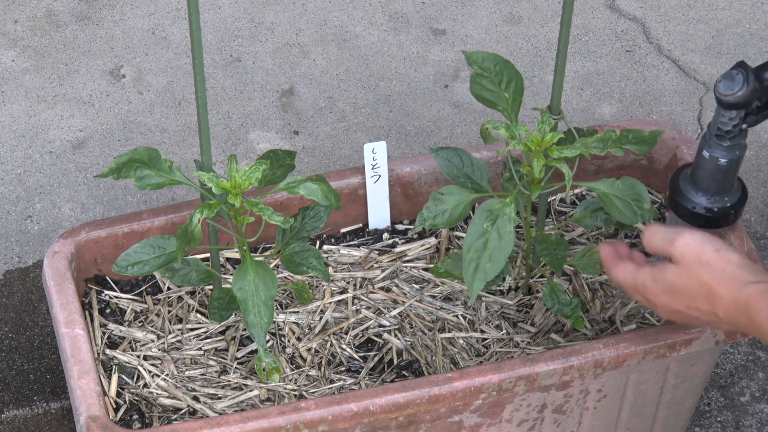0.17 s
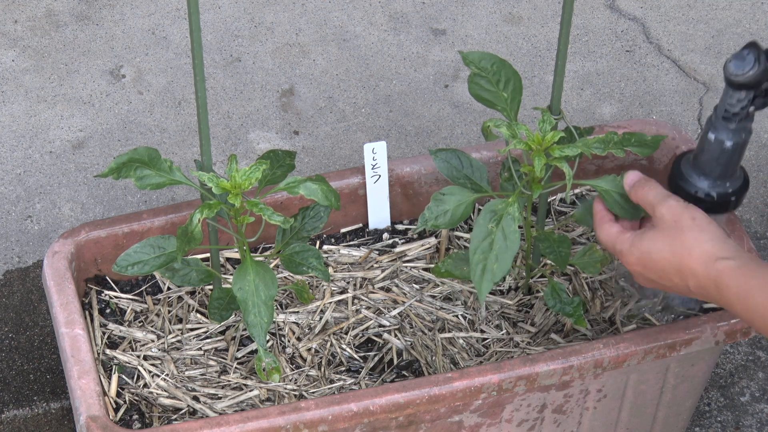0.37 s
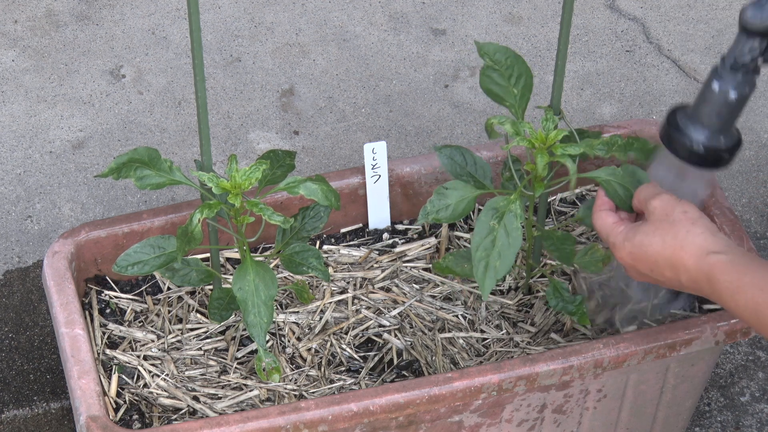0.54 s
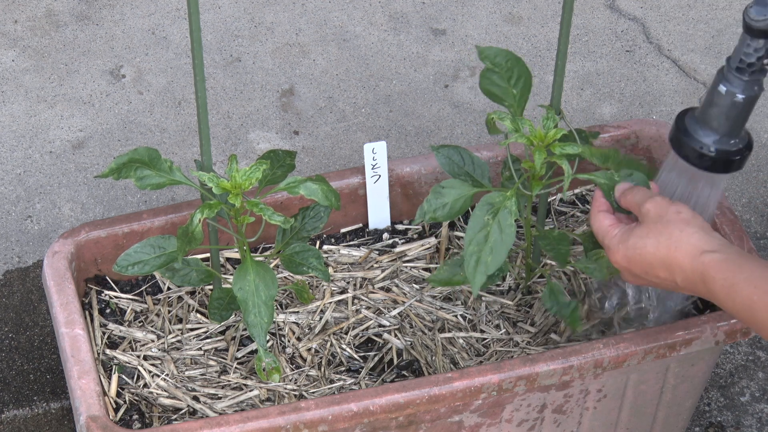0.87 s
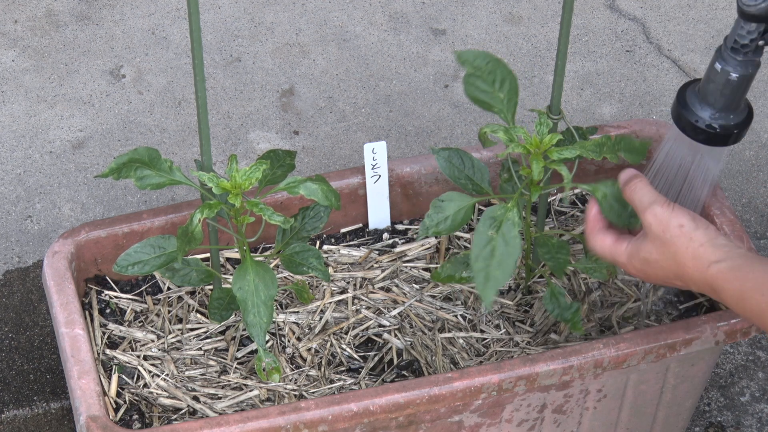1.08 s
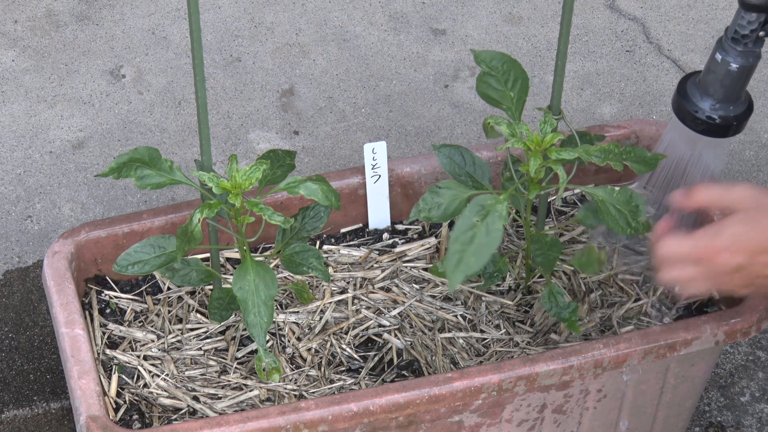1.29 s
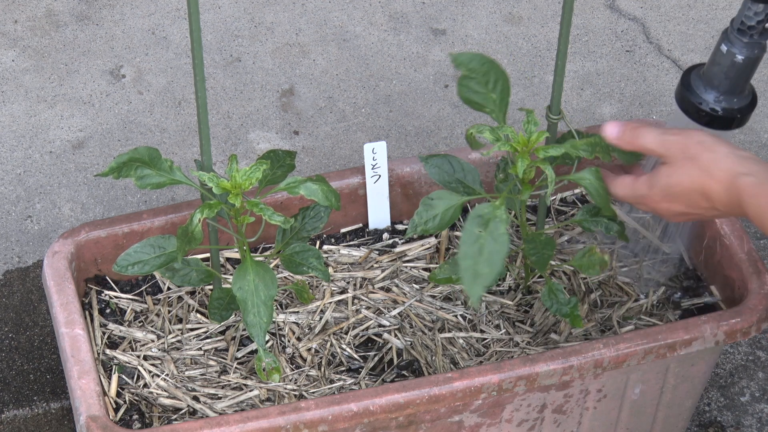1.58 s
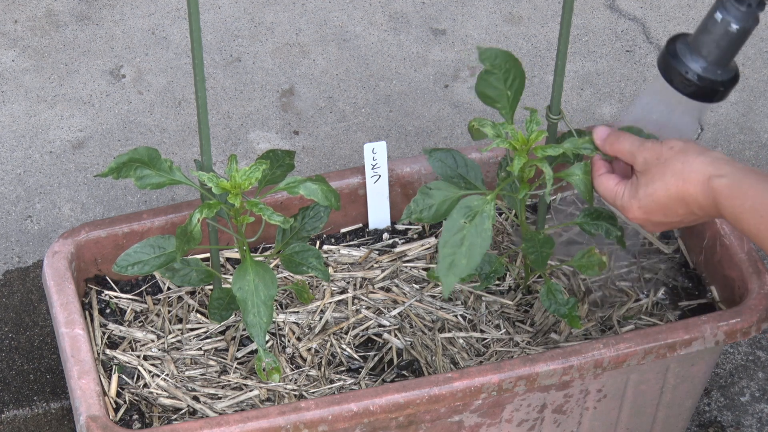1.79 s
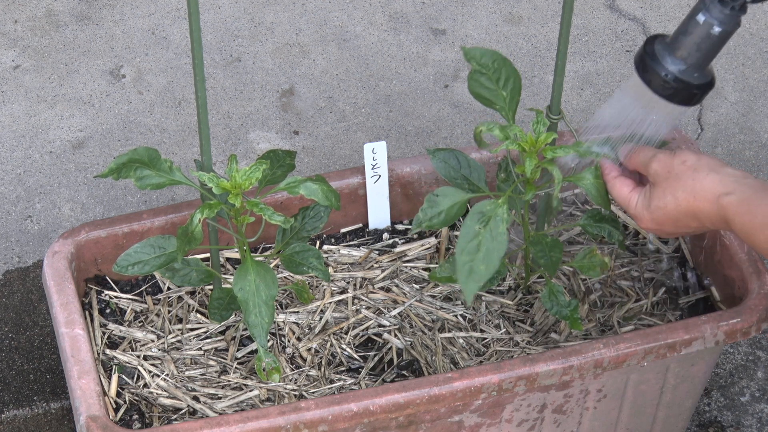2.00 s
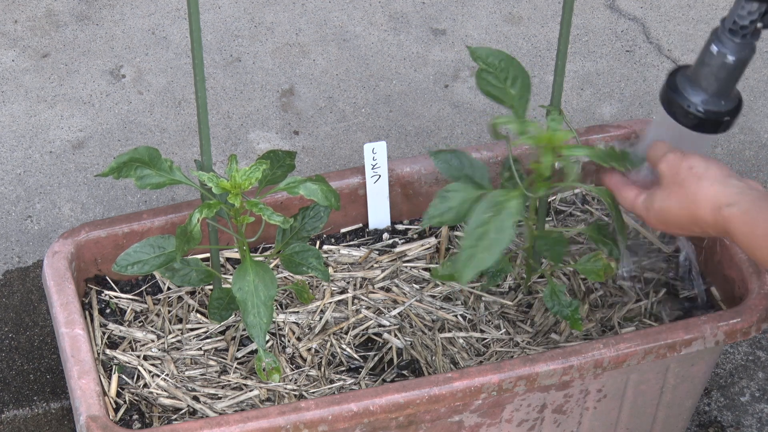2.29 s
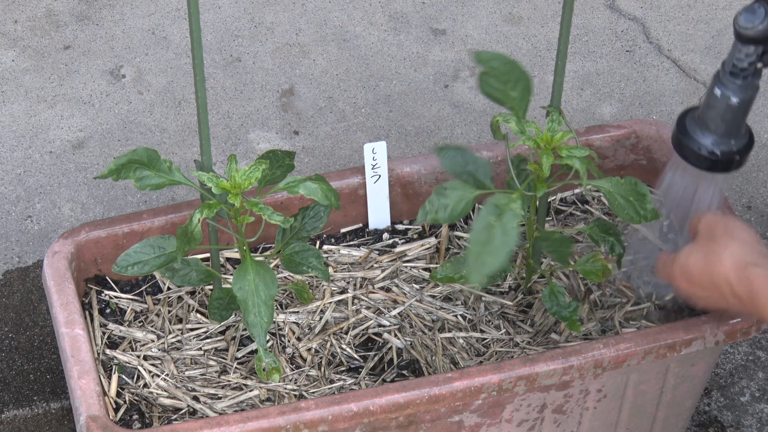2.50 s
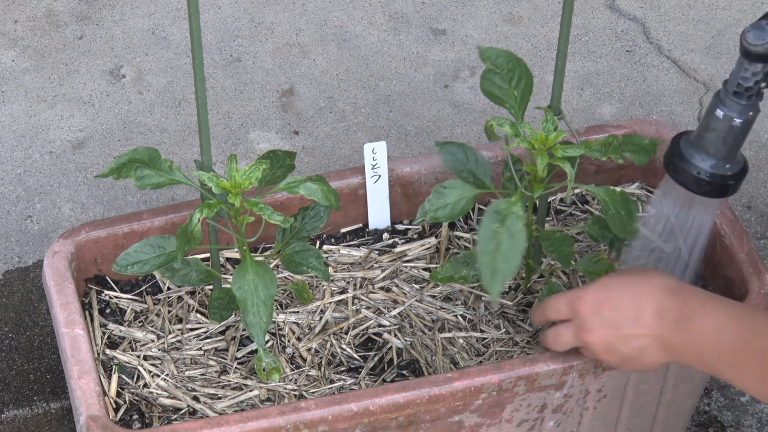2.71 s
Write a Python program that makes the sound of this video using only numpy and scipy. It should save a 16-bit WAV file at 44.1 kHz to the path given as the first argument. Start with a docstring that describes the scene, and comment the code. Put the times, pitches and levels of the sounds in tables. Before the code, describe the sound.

Water spray from a hose nozzle runs throughout, close and centred outdoors. A dense bright hiss patters on straw mulch, with splash and fizz off wet leaves. Hollow plastic drumming weakens around 0.65-1.0 seconds, returns strongly from 1.1 to 1.75, sinks again until about 2.4, then surges back near 2.5. Short gliding sizzles appear around 0.45-0.8, 1.6-2.0 and 2.2-2.35. Faint outdoor air and low motor hum lie underneath.

```python
"""In a garden, a shower nozzle on a hose waters a plastic planter of straw mulch and leaves.
Random drop impacts ring the planter's resonances; it drums hollowly when the spray reaches it
and falls back when a hand or leaf gets in the way. Coloured drop noise makes the hiss on the mulch and
the splash and fizz off wet leaves; gliding narrow bands sizzle where the jets strike something close.
Shaped noise and three low sines lay outdoor air and a faint motor hum underneath."""
import sys
import numpy as np
from scipy import signal
from scipy.fft import rfft, irfft, next_fast_len
from scipy.io import wavfile
from scipy.ndimage import map_coordinates

SR = 44100
rng = np.random.default_rng(int(sys.argv[2]) if len(sys.argv) > 2 else 0)


def dump(signal):
    """Clip the signal to [-1, 1] and save it as 16-bit WAV at the path in sys.argv[1]."""
    limited = np.clip(np.atleast_2d(signal).T, -1, 1)
    pcm = np.round(limited * 32767).astype(np.int16)
    wavfile.write(sys.argv[1], SR, pcm)


N = 125685  # length in samples
BIG_DROPS_PER_S, DROPS_PER_S, FINE_DROPS_PER_S = 4800, 12000, 15000


def amp(db):
    """Decibels to gain."""
    return 10 ** (np.asarray(db) / 20)


def unit(x):
    """x at rms 1."""
    return x / np.sqrt(np.mean(x ** 2) + 1e-20)


def curve(rows):
    """(time in s, value) points joined by straight lines, one value per sample."""
    return np.interp(np.arange(N) / SR, *np.transpose(rows))


def wobble(rate):
    """A smooth random curve through `rate` normally distributed knots a second."""
    knots = rng.standard_normal(int(N * rate / SR) + 4)
    return map_coordinates(knots, [np.arange(N) * rate / SR])


def filtered(x, gain):
    """x through the minimum-phase filter with this gain as a function of frequency in Hz."""
    m = 2 * next_fast_len(N)
    log_gain = np.log(np.maximum(gain(np.fft.rfftfreq(m, 1 / SR)), 1e-6))
    # folding the cepstrum onto positive time makes the filter causal
    cepstrum = irfft(log_gain, m)
    cepstrum[1:m // 2] *= 2
    cepstrum[m // 2 + 1:] = 0
    response = np.exp(rfft(cepstrum))
    return irfft(rfft(x, m) * response, m)[:N]


def coloured(x, points):
    """x with a (Hz, dB) colour drawn over log frequency, at rms 1."""
    f, db = np.transpose(points)
    return unit(filtered(x, lambda hz: amp(np.interp(np.log(hz + 1), np.log(f), db))))


def resonance(hz, centre, width):
    """A resonant peak of height 1, down to a third of its gain one width from the centre."""
    return 1 / (1 + ((hz - centre) / width * np.sqrt(2)) ** 2)


def drops(rate, scatter_db):
    """Random impacts of uneven size and either sign, about `rate` a second, at rms 1."""
    lands = rng.random(N) < rate / SR
    size = amp(scatter_db * np.clip(rng.standard_normal(N), -3, 3))
    return unit(lands * size * np.sign(rng.standard_normal(N)))


def patchy(x, depth_db, band_hz, life_s):
    """x with passing patches of stronger and weaker bands, at rms 1; depth is the rms swing."""
    window, hop = 512, 256
    z = signal.stft(x, nperseg=window)[2]

    def bell(spread):
        return np.exp(-.5 * (np.arange(-30, 31) / spread) ** 2)

    # the blur's standard deviations are half of band_hz and half of life_s
    across_bands = bell(band_hz / 2 * window / SR)
    along_time = bell(life_s / 2 * SR / hop)
    blur = np.outer(across_bands, along_time)
    field = signal.fftconvolve(rng.standard_normal(z.shape), blur, 'same')
    return unit(signal.istft(z * amp(depth_db * unit(field)), nperseg=window)[1][:N])


def planter():
    """Heavy drops thud on wet soil and ring the plastic box, whose deep hollow swings less than its walls."""
    # how hard the spray drums, before the trim: (time [s], level [dB])
    drumming = [(0, -45), (.52, -43), (.66, -51), (.86, -54.5), (1.04, -48.5), (1.15, -42.5), (1.31, -43.5),
                (1.38, -40.5), (1.75, -41), (1.8, -45.5), (2.08, -47.5), (2.13, -52), (2.34, -51),
                (2.53, -42.5), (2.72, -46.5), (2.8, -43), (2.85, -43)]
    # the upper resonances, before the trim: (time [s], level [dB])
    upper_ring = [(0, -43.5), (.15, -47.5), (.25, -42), (.48, -42), (.63, -50), (.95, -50.5), (1.12, -44.5),
                  (1.3, -45.5), (1.43, -42), (1.7, -44), (1.83, -50.5), (2.2, -50), (2.42, -48),
                  (2.52, -41), (2.62, -41), (2.76, -46.5), (2.85, -43.5)]
    # resonances from deep hollow to thin walls: (frequency [Hz], width [Hz], level within its group [dB])
    modes = [(375.4, 60, -10), (566, 75, -2.5), (631, 70, 0.5), (691, 60, -4), (888, 107, -2),
             (1001, 81, -5), (1187, 71, -1.5), (1256, 65, 0), (1319, 60, -0.5), (1484, 55, -6),
             (1584, 78, -1.5), (1789, 63, -4.5), (1937, 65, -2), (2022, 47, -5.5), (2110, 79, -3),
             (2327, 43, -3.5), (2430, 64, -6), (2697, 105, -6), (2914, 110, -4.5), (3178, 60, -1.5)]
    # tone of the drops on soil: (frequency [Hz], relative level [dB])
    thud_colour = [(30, -42), (130, -17.5), (300, -5), (445, -10), (600, -1.5), (770, -6.5), (1300, -4.5),
                   (2500, -1.5), (4000, -5), (9000, -19)]
    walls_from_hz, upper_from_hz = 750, 1700
    box_db, thud_db = -52, -50.5  # at the drumming's mean level
    walls_trim_db, upper_trim_db = -2.1, -1.6
    deep_follows = .5  # share of the drumming's swing in dB

    blows = patchy(drops(BIG_DROPS_PER_S, scatter_db=3), depth_db=0.9, band_hz=180, life_s=0.078)

    def ring(group):
        def gain(hz):
            return np.sqrt(sum((amp(db) * resonance(hz, centre, width)) ** 2 for centre, width, db in group))
        return unit(filtered(blows, gain))

    box = ring([m for m in modes if m[0] < walls_from_hz])
    walls = ring([m for m in modes if walls_from_hz <= m[0] < upper_from_hz])
    upper = ring([m for m in modes if m[0] >= upper_from_hz])
    thud = coloured(drops(BIG_DROPS_PER_S, scatter_db=4.5), thud_colour)

    force_db = curve(drumming)
    deep_swing = amp(deep_follows * (force_db - force_db.mean()))
    deep = deep_swing * (amp(box_db) * box + amp(thud_db) * thud)
    bright_walls = amp(force_db + walls_trim_db) * walls
    return deep + bright_walls + amp(curve(upper_ring) + upper_trim_db) * upper


def hiss():
    """The jets break on the mulch in a dense, shifting patter of drops."""
    # the jets landing, before trim and flicker: (time [s], level [dB])
    landing = [(0, -41), (.28, -38), (.56, -40), (.63, -43), (.82, -43), (.905, -44), (.93, -39.5),
               (1.16, -38), (1.32, -41), (1.55, -40.5), (1.7, -39.5), (1.8, -42.5), (2.03, -40),
               (2.15, -41), (2.38, -40.5), (2.47, -37.5), (2.72, -38.5), (2.77, -41.5), (2.85, -37.5)]
    # tone of the patter: (frequency [Hz], relative level [dB])
    colour = [(500, -32), (2000, -18.5), (2850, -11.5), (3250, -3.5), (3600, -.5), (4300, 0), (4750, -2.5),
              (5200, -8.5), (5700, -17), (9000, -27.5), (16000, -50)]
    trim_db = -0.38
    patter = patchy(drops(DROPS_PER_S, scatter_db=2.5), depth_db=2, band_hz=88, life_s=0.016)
    flicker_db = 0.27 * wobble(34.9)
    return amp(curve(landing) + trim_db + flicker_db) * coloured(patter, colour)


def splash():
    """Bright spatter off wet leaves, with a fine fizz of droplets thrown back from the same impacts."""
    # drops splashing on wet leaves, before the trim: (time [s], level [dB])
    splashing = [(0.0, -47), (0.09, -46), (0.16, -50), (0.61, -47.5), (0.62, -48.5), (1.16, -47),
                 (2.05, -48), (2.08, -49.5), (2.26, -45.5), (2.33, -49), (2.48, -44.5), (2.85, -47.5)]
    # the finest splashes, before the trim: (time [s], level [dB])
    fizzing = [(0, -52.5), (.3, -56), (.5, -56), (.65, -58), (.92, -57.5), (1, -52), (1.32, -55.5),
               (1.58, -52), (1.9, -56), (2.36, -55), (2.45, -51), (2.7, -54), (2.85, -57)]
    # tones of splash and fizz: (frequency [Hz], relative level [dB])
    splash_colour = [(2000, -23.5), (4500, -4), (5500, 0), (6600, 0), (7300, -3), (8400, -0.5), (9300, -7),
                     (12000, -18), (16000, -33)]
    fizz_colour = [(2000, -27), (6000, -5.5), (8300, -0.5), (10000, 0.5), (12500, -3), (16000, -9.5)]
    splash_trim_db, fizz_trim_db = -0.5, 1.4

    spatter = patchy(drops(FINE_DROPS_PER_S, scatter_db=3), depth_db=1.73, band_hz=130, life_s=0.018)
    spatter = spatter * amp(.3 * wobble(24.9))
    # random signs scramble the waveform but keep the size of each impact
    droplets = spatter * np.sign(rng.standard_normal(N))
    leaves = amp(curve(splashing) + splash_trim_db) * coloured(spatter, splash_colour)
    fizz = amp(curve(fizzing) + fizz_trim_db) * coloured(droplets, fizz_colour)
    return leaves + fizz


def sizzles():
    """Jets striking a hand or leaf close by: narrow bands of spatter that swell, glide a little and stop."""
    # (start [s], length [s], level before the swell [dB], first pitch [Hz], last pitch [Hz], width [Hz])
    strikes = [(.44, 0.11, -41.5, 3700, 3406, 600), (.63, .06, -45, 4900, 4750, 600),
               (.685, .11, -37.5, 4720, 4470, 485), (1.61, 0.065, -42, 4150, 4180, 350),
               (1.812, 0.062, -45.5, 5380, 5330, 700), (1.85, .135, -40.5, 4144, 4470, 550),
               (1.97, 0.076, -45, 5000, 5000, 900), (2.16, .11, -54, 8550, 8100, 320),
               (2.25, .06, -44.5, 3050, 3350, 550), (2.29, 0.055, -37, 3650, 3494, 420)]
    edge_s = 0.015  # time constant of the soft rise and fall
    t, out = np.arange(N) / SR, np.zeros(N)
    for start, length, db, first_hz, last_hz, width in strikes:
        end = start + length
        fine = drops(FINE_DROPS_PER_S, scatter_db=1.2)
        spatter = unit(filtered(fine, lambda hz: resonance(hz, first_hz, width)))
        # shift the whole band by a growing number of Hz
        shift_hz = np.interp(t, [start, end], [0, last_hz - first_hz])
        turns = np.cumsum(shift_hz) / SR
        gliding = np.real(signal.hilbert(spatter) * np.exp(2j * np.pi * turns))
        swell = (np.tanh((t - start) / edge_s) - np.tanh((t - end) / edge_s)) / 2
        out += amp(db) * swell * gliding
    return out


def background():
    """Outdoor air as shaped noise, and a distant motor as sines whose phase drifts slightly."""
    # the motor's tones: (frequency [Hz], rms level [dB])
    motor = [(60.2, -79), (84, -71.5), (108, -76.5)]
    # tone of the air: (frequency [Hz], relative level [dB])
    air_colour = [(15, -45), (30, -28), (45, -18), (70, 2), (130, -4), (300, 4), (700, -1.5), (2000, -12),
                  (16000, -40)]
    air_db, drift_rad = -66, 0.17
    t = np.arange(N) / SR
    hum = np.zeros(N)
    for hz, db in motor:
        phase = 2 * np.pi * (hz * t + rng.random()) + drift_rad * wobble(4.1)
        hum += amp(db) * np.sqrt(2) * np.sin(phase)
    return hum + amp(air_db) * coloured(rng.standard_normal(N), air_colour)


def scene():
    """Everything is heard from straight ahead, alike in both ears."""
    sound = planter() + hiss() + splash() + sizzles() + background()
    return np.array([sound, sound])


def record(dry):
    """A sharp cut removes everything from the top frequency up."""
    top_hz = 15800
    m = next_fast_len(N + SR // 2)
    passes = np.fft.rfftfreq(m, 1 / SR) < top_hz
    return irfft(rfft(dry, m) * passes, m)[:, :N]


dry = scene()
out = record(dry)
dump(out)
```